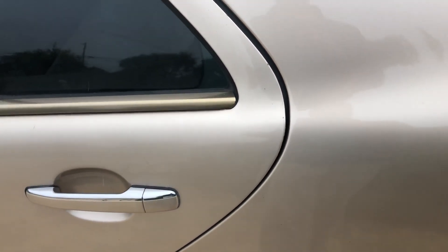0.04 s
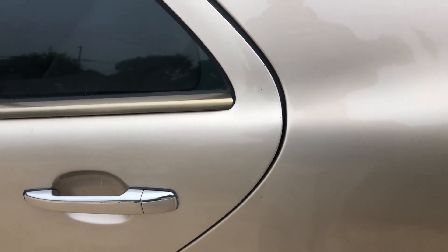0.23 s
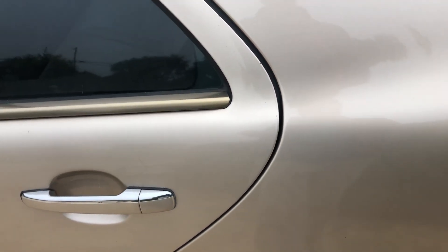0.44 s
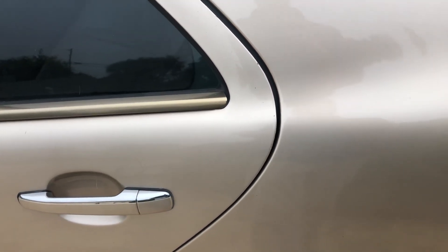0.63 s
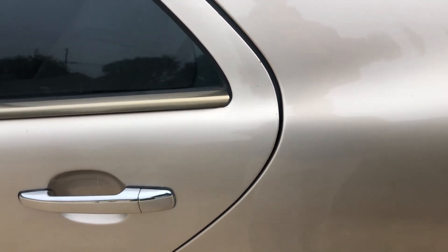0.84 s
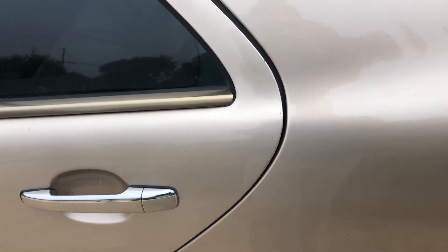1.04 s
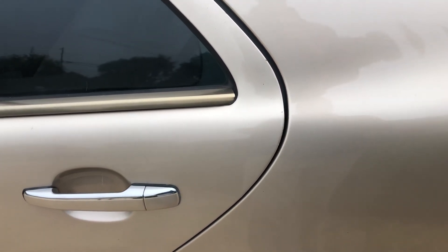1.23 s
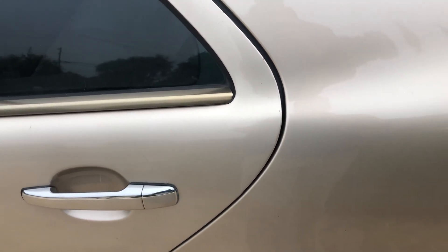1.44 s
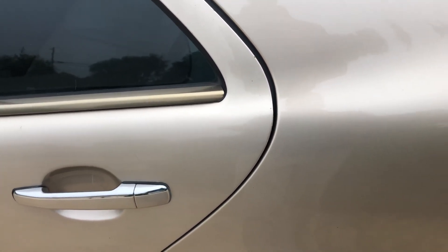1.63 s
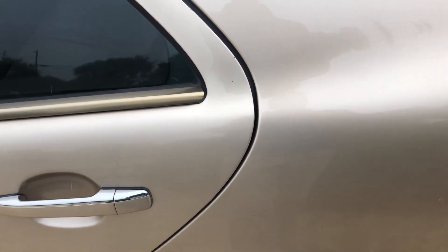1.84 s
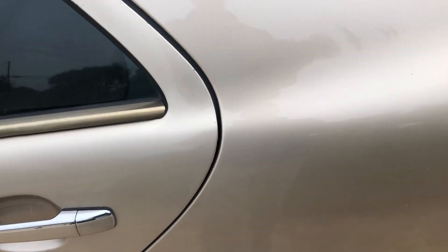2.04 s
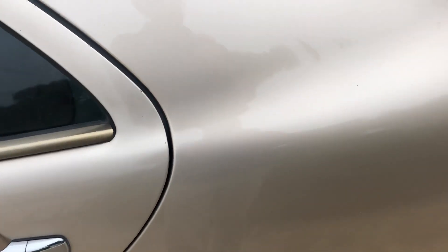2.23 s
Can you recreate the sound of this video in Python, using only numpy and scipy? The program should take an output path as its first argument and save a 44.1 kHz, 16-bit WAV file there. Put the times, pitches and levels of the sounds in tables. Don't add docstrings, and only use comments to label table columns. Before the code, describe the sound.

Dry grit crackles and crunches underfoot beside a parked car, with a few small plastic clicks

```python
import sys
import numpy as np
from scipy import signal
from scipy.fft import rfft, irfft, next_fast_len
from scipy.io import wavfile
from scipy.ndimage import map_coordinates

SR = 44100
rng = np.random.default_rng(int(sys.argv[2]) if len(sys.argv) > 2 else 0)


def persist_wave(psi):
    counts = np.round(np.clip(psi, -1, 1) * 32767).astype(np.int16)
    wavfile.write(sys.argv[1], SR, np.atleast_2d(counts).T)


def magnitude_from_level(level_db):
    exponent = np.asarray(level_db, float) / 20
    return 10 ** exponent


N = 101430

# pitch_hz, level_db (per Hz)
TRAFFIC_COLOUR = [(24, -11), (40, 1.5), (71, 0.5), (108, 1), (343, -18), (1200, -30.5), (1560, -43),
                  (2640, -120)]
# pitch_hz, level_db (per Hz)
AIR_COLOUR = [(470, -27), (800, -3.5), (3790, -8), (8030, -13.5), (12000, -18), (16000, -15)]
# time_s, pitch_hz, level_db
BIRD_WHISTLE = [
    (1.26, 2950, -87),
    (1.34, 3110, -82),
    (1.39, 3000, -87),
    (1.45, 2860, -81),
    (1.66, 2780, -84),
]
# start_s, length_s, level_db, high_over_low_ring_db
CRUNCH_BURSTS = [(0, 0.11, -73, -7), (0.195, 0.12, -57, 1), (0.26, 0.091, -59, 0), (0.35, 0.069, -78, -2),
                 (0.41, 0.09, -70.5, 12), (0.97, 0.27, -80, -8), (1.583, 0.94, -78.5, -11),
                 (1.662, 0.027, -67.5, 5), (1.704, 0.026, -62, 0), (1.737, 0.059, -62, -5),
                 (1.889, 0.022, -73, 2), (2.004, 0.041, -67, -2), (2.189, 0.063, -77, 4)]
# pitch_hz, width_hz, level_db
GRIT_RINGS = [(2676, 880, 0.5), (4350, 1070, 0.5), (5500, 1000, -5)]
# pitch_hz, width_hz, level_db
BRIGHT_EDGE = [(9600, 3600, -6), (16000, 7700, 0.5)]

# time_s, peak_db, pitch_hz, treble_over_body_db
FIRST_SHUFFLE = [(0.0352, -54, 4220.0, -7), (0.0421, -44, 3370, -21), (0.046, -42.5, 2750, -21.0),
                 (0.0544, -48.0, 4200.0, -11.0), (0.0577, -53, 2540.0, -18.0), (0.0737, -43.5, 2800, -3),
                 (0.0817, -35, 3190, -22), (0.0885, -47.0, 3320.0, -25), (0.1256, -40.5, 2500, -11.5),
                 (0.1317, -49.5, 5450, -12), (0.1975, -37.0, 10300, -6.0), (0.2029, -37, 6670, -15),
                 (0.2054, -42.0, 7170.0, -8), (0.2102, -40, 3900, 7), (0.2128, -43, 5600, 0),
                 (0.2183, -25.5, 4200, -2), (0.2222, -32, 3660, -16), (0.2319, -22.5, 4630, -6.0),
                 (0.2349, -24, 4360, -12), (0.2376, -28, 3000, -3), (0.2475, -21.5, 2660, -10),
                 (0.2545, -38, 2500.0, 6), (0.2668, -23, 3570, -4.5), (0.2697, -20.5, 2710.0, -7.5),
                 (0.2773, -28, 4240.0, -9), (0.2872, -35, 5880.0, -1.0), (0.2911, -29.5, 2450.0, 0.5),
                 (0.2998, -44, 2500.0, -3), (0.3077, -45, 10530.0, -4), (0.314, -35, 4250, -17),
                 (0.3177, -37, 2570, -20.0), (0.3203, -41, 2950.0, -12.0), (0.3299, -39, 2330.0, -15),
                 (0.3391, -33.5, 2550, -9), (0.3428, -43, 2520.0, -12), (0.3467, -43.5, 3270.0, -3),
                 (0.35, -49.0, 2900, -12)]
SETTLING = [(0.3835, -49.5, 2690.0, -11.0), (0.417, -38.5, 4200, -22.0), (0.4205, -42, 4300, -16.0),
            (0.4236, -58, 4480.0, -24), (0.427, -39, 2500.0, -20.0), (0.4292, -40.5, 4420, -19.0),
            (0.4387, -52, 4250, -18.0), (0.4434, -48, 4330, -13.0), (0.4514, -38.5, 4350.0, -0.5),
            (0.453, -50, 4600, -3), (0.4583, -44, 9950.0, -6.0), (0.4626, -55, 4410.0, -8),
            (0.466, -48, 4330, -3), (0.4693, -55, 4400, -14.0), (0.4784, -48.5, 3140, -21),
            (0.4844, -51, 4300, -12.0), (0.4904, -50.5, 3930, -18.0), (0.4982, -49.5, 3900, -20),
            (0.6802, -52.5, 2890.0, -5.5), (0.9493, -46, 2730.0, -9), (0.9545, -45, 7130.0, -14),
            (0.9651, -44, 2950.0, -13.0), (0.9951, -46, 2600, -25.0), (0.9983, -56, 5960.0, -8.0),
            (1.017, -50, 3100.0, -12), (1.0346, -46.5, 2930.0, -22.0), (1.093, -52, 2940, -17.0),
            (1.0974, -40.5, 2470, -29.0), (1.1348, -48, 2900, -2.5), (1.1416, -47.5, 2750, -22.0),
            (1.2023, -43.5, 5100, -15), (1.2318, -45, 2560, -4), (1.2413, -51.5, 3620.0, 2),
            (1.2655, -51.0, 3880, -10), (1.4275, -49, 7280.0, -6.0)]
SECOND_SHUFFLE = [(1.5702, -34, 2580, -9.5), (1.5748, -33, 4110, -11), (1.631, -47, 2880, -4),
                  (1.6428, -48.0, 2650.0, -23.0), (1.662, -35.5, 3870, 0.5), (1.6662, -33, 2600, -7),
                  (1.6794, -45, 2630.0, -1), (1.6832, -48.0, 5280.0, -5.0), (1.6889, -51.0, 3450.0, -9.0),
                  (1.7063, -49, 3680.0, -9.0), (1.711, -36.5, 10500, -10), (1.714, -38.5, 2970.0, -8.0),
                  (1.7188, -36, 4310.0, -10.0), (1.7239, -41, 3800, -17), (1.7422, -30.5, 4250, -9.0),
                  (1.7473, -35, 4320, -22), (1.7512, -41.0, 2480.0, -30), (1.7547, -50, 4540.0, -22),
                  (1.76, -44, 2380, -11), (1.7671, -40.0, 8250, -8), (1.773, -38.0, 1940.0, -11),
                  (1.7747, -32.5, 8550, -3), (1.7824, -32, 4040, -7), (1.7897, -43, 4100, -22),
                  (1.7946, -35.0, 4410.0, -27.0), (1.797, -38, 3700, -21.0), (1.8046, -46, 4200, -17),
                  (1.8183, -41.5, 2460, -17)]
LAST_SCUFF = [(1.876, -51.5, 2610.0, -4), (1.888, -35.5, 4320, -8), (1.8942, -46, 4100, -12),
              (1.902, -38, 5750, -10), (1.9085, -52.0, 4800, -12.0), (1.964, -45.5, 2340, -22.0),
              (2, -53, 2450.0, -18.0), (2.0052, -51, 2670.0, -2), (2.0164, -30, 4130, -6),
              (2.0174, -32.0, 5930, -10), (2.022, -39, 3570, -11), (2.032, -35.5, 9500, -15),
              (2.0348, -36.5, 2500, -18), (2.0446, -44, 9560.0, -11), (2.061, -41.5, 8100, -9),
              (2.1058, -41.5, 8100, -10), (2.1086, -50, 8900, -8), (2.1314, -50.0, 10440.0, -6.0),
              (2.1879, -41, 2120, -7.5), (2.1913, -46.0, 2200, -17), (2.1948, -41.5, 5760, -14),
              (2.2037, -50.0, 8380.0, -4), (2.2226, -47.5, 2540, 7), (2.23, -48, 6350.0, -12),
              (2.233, -51, 6290.0, -6.0)]
FAINT_SNAPS = [(.0015, -43, 4120, -14), (0.0706, -46, 3280, -3), (0.2558, -33, 3660, -7),
               (0.271, -23, 4350, -18), (.2806, -33, 4570, -8), (.5602, -60, 2200, -7),
               (0.5957, -47.5, 3640, -11), (.6455, -57.5, 3760, -9), (.6656, -56, 4640, -12),
               (1.355, -54, 4170, -8)]
CLEAN_BREAKS = [
    (.2284, -10, 3990, -15.5),
    (.6041, -44, 2430, -7),
    (.8634, -38, 1400, -42),
    (.8638, -47, 2380, -30),
    (1.3745, -43, 1520, -27),
    (1.7403, -27.5, 2580, -5),
    (2.2208, -37, 5440, 1),
    (2.221, -37, 2390, -23),
    (1.7, -48.5, 890, -40),
]

# time_s, peak_db, treble_over_body_db, upper_modes_db
PLASTIC_CLICKS = [
    (0.9584, -26, -7.5, -3.5),
    (0.9597, -34.5, -10, -4.5),
    (1.1958, -24, -4, -2),
    (1.4212, -31.5, -6, -0.5),
    (1.422, -36.5, -8, 5),
    (1.6247, -28, -9, -4.5),
    (1.627, -36, -4, -5),
]
# pitch_hz, width_hz, level_db
PLASTIC_MODES = [(500, 710, -17), (1400, 1030, -7.5), (2200, 570, 0.5), (2950, 430, -0.5)]
# pitch_hz, width_hz, level_db
PLASTIC_UPPER_MODES = [(5040, 820, 0), (7140, 1360, -3.5)]

TRAFFIC_DB, AIR_DB, LOW_CUT_HZ = -56.5, -73.5, 59.6
ENGINE_HZ, ENGINE_WIDTH_HZ, ENGINE_DB = 88, 22.4, -61
INSECT_HZ, INSECT_WIDTH_HZ, INSECT_DB = 9800, 620, -87
BIRD_OVERTONE_DB = -17
ATTACK_S, RELEASE_S, SAG_DB = 0.00056, 0.0076, -3.5
GRAINS_PER_S, GRAIN_SPREAD_DB = 1300, 1.5
FIZZ_DB, FIZZ_SPIKINESS = 0.5, 1.6
CRACK_DB, TREBLE_DB, TREBLE_HZ = -3, 7.5, 7960
BODY_T60_S, TREBLE_T60_S, CRUMB_SPIKINESS = 0.016, 0.014, 1.59
SHARED_GRIT_DB, DULL_OVER_PITCH = -9.5, 2.43
SNAP_SHARPNESS, SNAP_CRUMBLE_DB, SNAP_THIN_HZ = 8.5, -17.5, 2290
BREAK_SHARPNESS, BREAK_CRUMBLE_DB, BREAK_THIN_HZ = 4.7, -24.5, 300
PANEL_ECHO_S, PANEL_ECHO_DB, CLICK_CRUMBLE_DB = 0.007, -23, -21
TOP_HZ = 15750


def unit(x):
    return x / np.sqrt(np.mean(x ** 2) + 1e-20)


def peak(f, hz, width):
    return 1j * f * width / (hz * hz - f * f + 1j * f * width)


def resonances(f, table):
    return sum((-1) ** k * magnitude_from_level(db) * peak(f, hz, width) for k, (hz, width, db) in enumerate(table))


def filtered(x, response):
    length = x.shape[-1]
    m = next_fast_len(length + 8192)
    spectrum = rfft(x, m) * response(np.fft.rfftfreq(m, 1 / SR))
    return irfft(spectrum, m)[..., :length]


def wobble(rate):
    knots = rng.standard_normal(int(N * rate / SR) + 4)
    return map_coordinates(knots, [np.arange(N) * rate / SR])


def hiss(response):
    return unit(filtered(rng.standard_normal(N), response))


def coloured(points):
    hz, db = np.transpose(points)
    return lambda f: magnitude_from_level(np.interp(np.log(f + 1), np.log(hz + 1), db))


def surroundings():
    traffic = hiss(lambda f: coloured(TRAFFIC_COLOUR)(f) / (1 + (LOW_CUT_HZ / (f + 1)) ** 4))
    engine = hiss(lambda f: peak(f, ENGINE_HZ, ENGINE_WIDTH_HZ) ** 2)
    air = hiss(coloured(AIR_COLOUR))
    insects = hiss(lambda f: peak(f, INSECT_HZ, INSECT_WIDTH_HZ) ** 2)
    return magnitude_from_level(TRAFFIC_DB) * traffic + magnitude_from_level(ENGINE_DB) * engine + magnitude_from_level(AIR_DB) * air + magnitude_from_level(INSECT_DB) * insects


def bird():
    s, hz, db = np.transpose(BIRD_WHISTLE)
    t = np.arange(N) / SR
    pitch = np.interp(t, s, hz) + 32 * wobble(120)
    phase = 2 * np.pi * np.cumsum(pitch) / SR
    level = magnitude_from_level(np.interp(t, s, db, -140, -140) + 3 * wobble(70))
    whistle = np.sin(phase) + magnitude_from_level(BIRD_OVERTONE_DB) * np.sin(2 * phase)
    return np.sqrt(2) * level * whistle


def treble(f):
    return (1j * f / (TREBLE_HZ + 1j * f)) ** 4 * (0.5 + resonances(f, BRIGHT_EDGE))


def pressure(lean):
    t = np.arange(N) / SR
    total = np.zeros(N)
    for start, length, db, high_db in CRUNCH_BURSTS:
        rise = (t - start) / ATTACK_S
        fall = 1 + (start + length - t) / RELEASE_S
        sag = magnitude_from_level(SAG_DB * np.clip((t - start) / length, 0, 1))
        total += magnitude_from_level(db + lean * high_db) * np.clip(np.minimum(rise, fall), 0, 1) * sag
    return total


def grains():
    struck = rng.random(N) < GRAINS_PER_S / SR
    size = magnitude_from_level(GRAIN_SPREAD_DB * np.minimum(rng.exponential(size=N), 3))
    return (struck * size + 0.17) * rng.standard_normal(N) * magnitude_from_level(2.5 * wobble(90))


def crunch():
    rings = np.zeros(N)
    for lean, (hz, width, db) in zip((-0.5, 0.5, 0), GRIT_RINGS):
        ringing = filtered(grains(), lambda f: peak(f, hz, width) * peak(f, hz, 3 * width))
        rings += magnitude_from_level(db) * pressure(lean) * unit(ringing)
    z = rng.standard_normal(N)
    fizz = np.sign(z) * np.abs(z) ** FIZZ_SPIKINESS * magnitude_from_level(4.3 * wobble(140))
    return rings + magnitude_from_level(FIZZ_DB) * pressure(0) * unit(filtered(fizz, treble))


def cracks(s, db, treble_db, ring, crumble_db):
    t = np.arange(1024) / SR
    z = rng.standard_normal((len(s), 2, len(t)))
    crumbs = magnitude_from_level(crumble_db) * np.sign(z) * np.abs(z) ** CRUMB_SPIKINESS
    blow = (t == 0) * 1.0
    body = filtered(blow + crumbs[:, 0] * magnitude_from_level(-60 * t / BODY_T60_S), ring)
    top = filtered(blow + crumbs[:, 1] * magnitude_from_level(-60 * t / TREBLE_T60_S), treble)
    body = body / np.abs(body).max(axis=1, keepdims=True)
    top = top / np.abs(top).max(axis=1, keepdims=True)
    rows = magnitude_from_level(db + CRACK_DB)[:, None] * (body + magnitude_from_level(treble_db + TREBLE_DB)[:, None] * top)
    at = np.round(s * SR).astype(int)[:, None] + np.arange(len(t))
    return np.bincount(at.ravel(), rows.ravel(), N + SR)[:N]


def clicks():
    s, db, treble_db, upper_db = np.transpose(PLASTIC_CLICKS)

    def plastic(f):
        upper = magnitude_from_level(upper_db)[:, None] * resonances(f, PLASTIC_UPPER_MODES)
        return resonances(f, PLASTIC_MODES) - upper

    def panel_echo(f):
        return 1 + magnitude_from_level(PANEL_ECHO_DB) * np.exp(-2j * np.pi * f * PANEL_ECHO_S)

    return filtered(cracks(s, db, treble_db, plastic, CLICK_CRUMBLE_DB), panel_echo)


def snaps(events, sharpness, crumble_db, thin_hz):
    s, db, hz, treble_db = np.transpose(events)
    hz = hz[:, None]

    def stone(f):
        thin = 1j * f / (thin_hz + 1j * f)
        dull = 1 + 1j * f / (DULL_OVER_PITCH * hz)
        own_ring = peak(f, hz, hz / sharpness)
        return (thin / dull) ** 2 * (own_ring + magnitude_from_level(SHARED_GRIT_DB) * resonances(f, GRIT_RINGS))

    return cracks(s, db, treble_db, stone, crumble_db)


def stones():
    rubbed = FIRST_SHUFFLE + SETTLING + SECOND_SHUFFLE + LAST_SCUFF + FAINT_SNAPS
    crumbling = snaps(rubbed, SNAP_SHARPNESS, SNAP_CRUMBLE_DB, SNAP_THIN_HZ)
    clean = snaps(CLEAN_BREAKS, BREAK_SHARPNESS, BREAK_CRUMBLE_DB, BREAK_THIN_HZ)
    return crumbling + clean


def scene():
    return (stones() + clicks() + crunch() + surroundings() + bird())[None]


def top_cut(x):
    return signal.sosfilt(signal.butter(12, 16960, fs=SR, output="sos"), x)


def record(dry):
    mix = filtered(dry, lambda f: magnitude_from_level(-26 * np.clip((f - TOP_HZ) / 300 + 0.5, 0, 1)))
    return top_cut(mix)


dry = scene()
out = record(dry)
persist_wave(out)
```